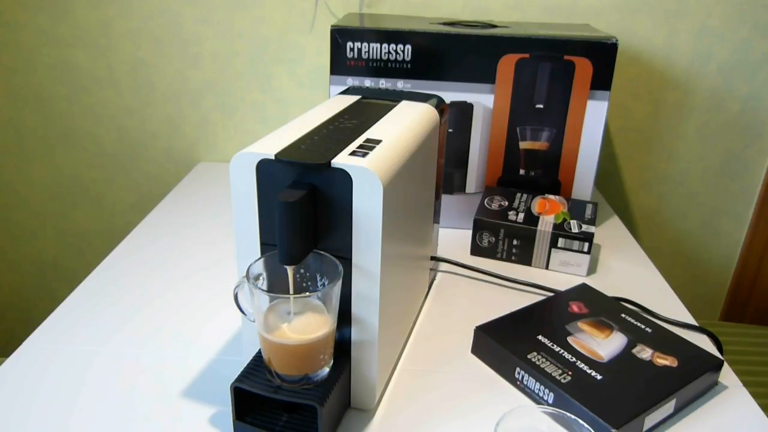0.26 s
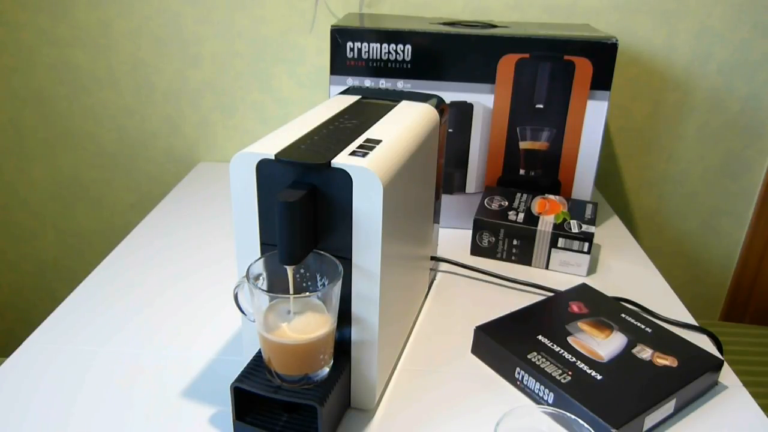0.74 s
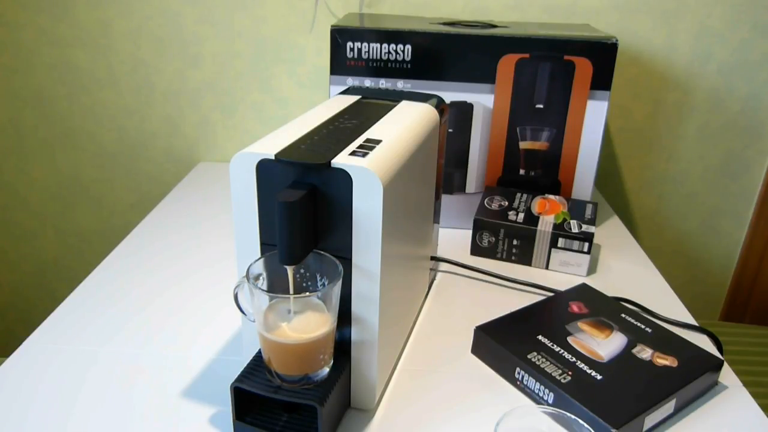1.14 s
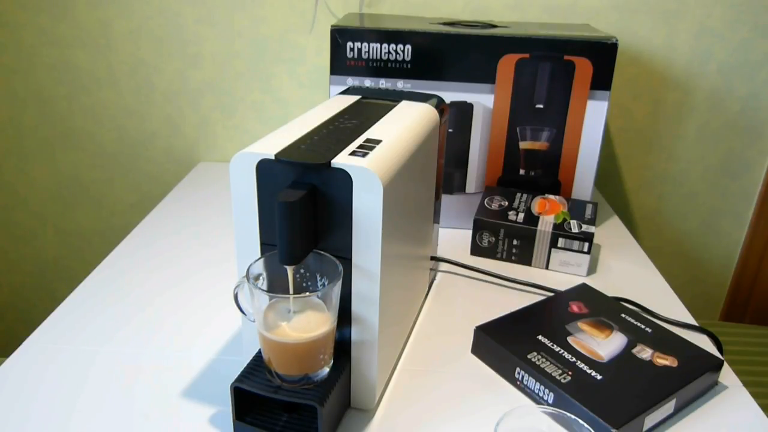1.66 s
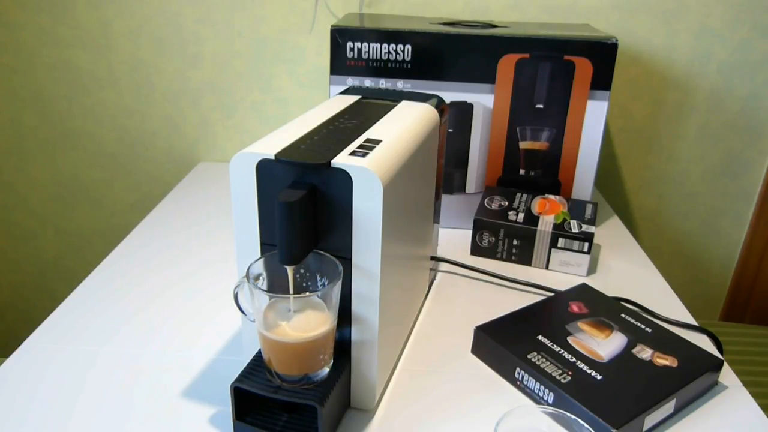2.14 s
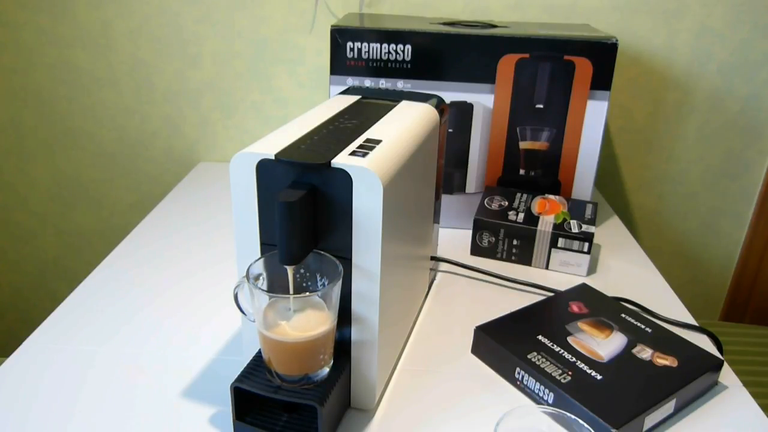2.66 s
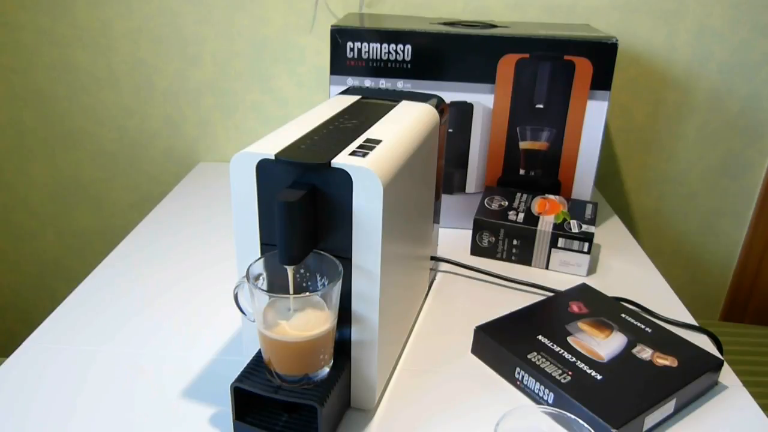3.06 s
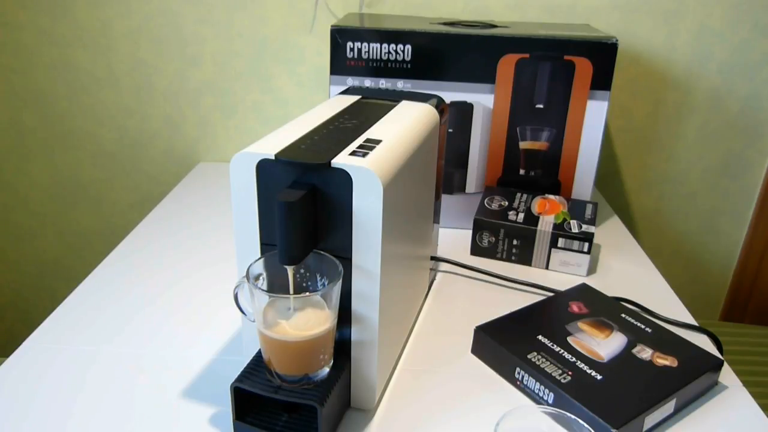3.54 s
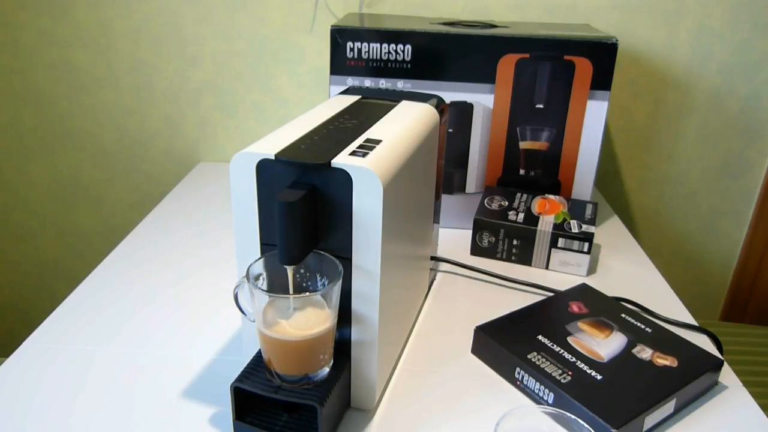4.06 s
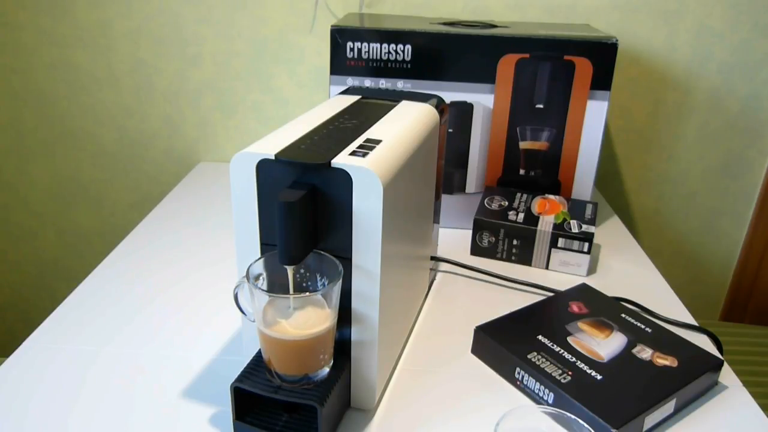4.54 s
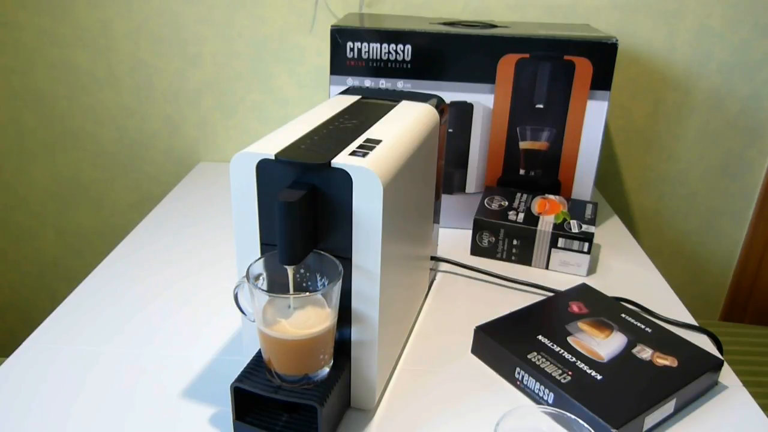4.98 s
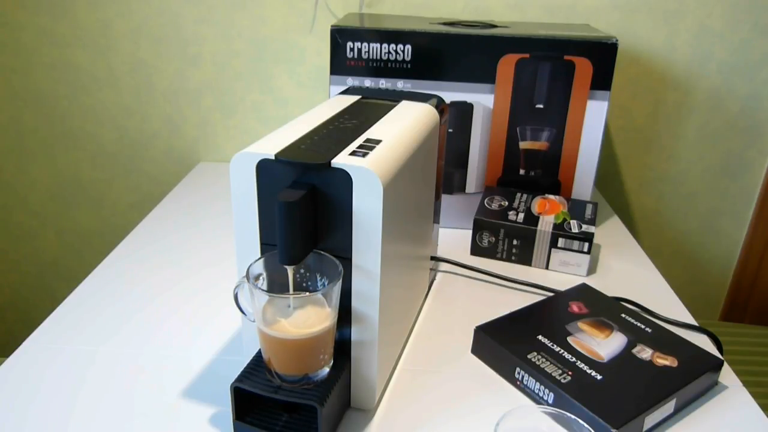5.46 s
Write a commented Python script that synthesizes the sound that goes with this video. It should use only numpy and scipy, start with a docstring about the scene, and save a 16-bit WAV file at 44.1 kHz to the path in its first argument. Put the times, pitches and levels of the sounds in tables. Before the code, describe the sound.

A capsule coffee machine's pump buzzes steadily with a rattling, hissing edge, then stops dead and rings out briefly in a small room.

```python
"""Capsule coffee machine, small room

A capsule coffee machine brews on a table in a small room, picked up in stereo at a distance that never changes.
Its mains-driven piston pump strokes strong-weak, so housing and table hum on every multiple of half the
mains rate. Valves tick and rattle on each stroke, a valve spring buzzes, a thin whine follows the pump and
the water hisses as noise in bands, over a room tone. The pump stops dead and the room rings out;
the microphone rolls off the top octave."""
import sys
import numpy as np
from scipy import signal
from scipy.io import wavfile

SR = 44100
rng = np.random.default_rng(int(sys.argv[2]) if len(sys.argv) > 2 else 0)


def wav_out(sig):
    """Save sig, one row per channel (or a flat mono array), as 16-bit PCM at SR to the path in sys.argv[1]."""
    wavfile.write(sys.argv[1], SR, np.round(np.clip(np.atleast_2d(sig).T, -1, 1) * 32767).astype(np.int16))


N = 251811
LEFT_RIGHT = np.array([[1], [-1]])

# pump rate, locked to the mains: [t/s, strokes per s]
PUMP_RATE = [(0.57, 50.02), (1.32, 50.008), (2.08, 50.012), (2.82, 50.013), (3.58, 50.005), (4.32, 50.01),
             (5.08, 50.004)]
STROKE_HZ = PUMP_RATE[0][1]
CYCLE_HZ, CYCLE_MS = STROKE_HZ / 2, 2000 / STROKE_HZ   # one cycle is a strong and a weak stroke
STOP_S = 5.588
VALVES_STOP_EARLY_S = 0.02   # valves and flow fall still one stroke before the housing does

# strong partials of housing and table: [multiple of the cycle rate, rms level/dB before changes, left-right/dB]
STRONG_HUM = [(3, -72, 0), (4, -66, 1), (5, -62, 0), (6, -44, 1), (7, -46, 1), (8, -51, -2), (9, -53, -2),
              (10, -56, -1), (11, -54, -2), (12, -50, -4), (13, -53, -2), (14, -38, -2), (15, -59, 2),
              (16, -42, -1), (17, -58, 1), (18, -47, 4), (19, -58, 1), (20, -60, 5), (21, -65, 0),
              (22, -60, -5), (24, -56, -5), (25, -60, 5), (26, -50, -2), (27, -63, 0), (28, -44, 0),
              (29, -53, -2), (30, -52, -4), (32, -59, 3), (33, -69, 0), (34, -63, 0), (35, -58, -5),
              (36, -56, -3), (37, -55, 0), (38, -55, 0), (39, -55, 1), (40, -52, -1), (41, -56, -2),
              (42, -60, -2), (43, -57, -2), (44, -56, 5), (45, -61, 1), (47, -60, 1), (48, -53, -1),
              (49, -59, 0), (50, -61, -3), (51, -60, -6), (53, -64, 1), (54, -56, 1), (57, -58, 1),
              (64, -60, -5), (65, -61, 0), (77, -58, -2), (79, -61, -7), (82, -60, 2)]
# weak spectrum about which all other multiples scatter: [f/Hz, rms level/dB before scatter and changes]
WEAK_HUM = [(520, -78), (850, -72), (1080, -74), (1330, -69.5), (1500, -67), (1630, -82), (1800, -65.5),
            (2000, -97), (2150, -77)]
TOP_MULTIPLE, WEAK_SCATTER_DB, WEAK_PAN_DB = 86, 2.5, 4
# phase by which the left channel leads, before reflections add to it: [f/Hz, lead/rad]
HUM_LEAD = [(60, 0), (200, 0), (225, -.4), (250, .4), (275, -.3), (300, .1), (325, -.5), (350, .4),
            (375, 1.8), (400, .1), (425, 0), (450, -2.1), (475, 1), (525, 1), (550, -.4), (600, .4),
            (650, -.3), (800, 0)]
# slow wander of a partial: [f/Hz, spread of level/dB]
WANDER = [(150, .15), (500, .5), (750, .6), (1000, 1.0), (2200, 1.4)]
# partials that change: [multiple, then change of level/dB while the pressure builds,
# in the first bright stretch, in the second, in the dull stretch between]
CHANGING = [(10, 4, 2, -1, -1), (13, -3, 3, 0, 2), (15, 2, 3, 0, -2), (17, 5, 4, -4, 1),
            (18, -4, -4, -1, 1), (19, 1, 3, 2, -13), (22, -2, 7, 0, -2), (25, -4, 1, 1, 1),
            (29, 1, -8, 0, -3), (30, -3, -2, 0, 2), (32, 2, 6, 1, 1), (33, -4, 10, -3, 1),
            (35, -4, -7, 0, -6), (37, 7, -9, -3, -7), (39, 3, 3, 2, -11), (40, 4, 4, 2, -1),
            (41, 3, 3, -1, 2), (42, -2, 2, 3, 0), (43, 1, -4, 2, -6), (47, -1, -3, 2, -1),
            (49, -1, -3, 1, -1), (50, -3, 3, 3, 1), (51, -5, 3, 0, 1), (53, -1, 6, 1, 3),
            (57, -4, -1, -1, 0), (77, -4, 2, -2, 1), (79, -8, 3, -3, 1), (82, -2, 2, 0, 3)]
PRESSURE_BUILDS_S, JUMP_S = 0.35, 0.031
# stretches where the hum jumps to a brighter colour and back: [from t/s, to t/s]
BRIGHT = [(.3, 2.34), (3.9, 5.8)]
DULLING_S = 1   # after the first stretch the hum dulls over this time

# knocks of the piston on the housing, which time the lower partials: [t/ms in the cycle, level/dB]
KNOCKS = [(8.8, -6), (14.22, 1.2), (25.08, -2.6), (34.85, -5.8), (36.73, -11)]
# blows that time the upper partials: lowest multiple they reach -> [t/ms in the cycle, level/dB]
UPPER_KNOCKS = {12: [(20.3, 0), (21.6, -2.2), (37.4, -10.2)], 20: [(16.2, 0), (24.1, 0)], 33: [(6.2, -1),
                (18.5, 0), (29.8, -.8), (37.3, -.7)], 59: [(3, -3.5), (10.4, -1.4), (16.2, 0), (30.8, -1.2),
                (33.5, -1.3)]}
# phase turns of the lower hum partials: [f/Hz, width/Hz]
PHASE_TURNS = [(170.2, 21), (294.6, 15), (310.8, 33), (449, 15), (505.7, 15)]
# phase scatter of the upper partials by reflections: [f/Hz, largest shift/rad]
SCRAMBLE = [(450, 0), (750, .1), (900, .25), (2000, .5)]

# decay once the pump has stopped: [f/Hz, t60/s]
RING_OUT = [(60, .15), (110, 0.18), (180, 0.32), (350, 0.21), (400, 0.33), (450, 0.97), (700, 0.22),
            (1100, 0.24), (2000, 0.3), (3000, 0.41), (8000, 0.4), (15000, 0.33)]
# table modes set ringing by the last stroke: [f/Hz, rms level/dB at the stop, t60/s]
FREE_MODES = [(160.7, -47, 0.46), (185.5, -41, 0.38), (451, -48, 0.5)]

# thin whine on the 130th multiple: [t/s, rms level/dB]
WHINE = [(0.0, -60), (0.2, -54.5), (2.3, -54), (4.4, -54), (4.7, -57), (5.55, -62)]

# effort of the pump: [t/s, hiss level/dB before trim, rattle gain/dB]
EFFORT = [(0.0, -39, -1.5), (0.17, -39, 0.5), (0.43, -39.5, -1), (3.09, -37.5, 0.5), (4.22, -39.5, 0.5),
          (5.55, -37.5, 0)]
HISS_TRIM_DB = -4.5
# colour of the water hiss: [f/Hz, relative level/dB per Hz]
HISS = [(25, -11), (60, -12), (100, -11), (130, -5.5), (200, -4.5), (330, -.5), (450, 1), (600, 2.5),
        (900, 4.5), (1100, 1.5), (2000, -2), (3000, -1.5), (4000, .5), (5000, 1), (8000, -3), (11300, -2.5),
        (12500, -15), (14200, -8), (15600, -29)]
# share of the hiss power that recurs each cycle: [f/Hz, share]
HISS_REPEATING = [(1200, 0.017), (1800, 0.19), (2600, 0.5), (4000, 0.63), (6000, 0.32), (9000, 0.15),
                  (14000, 0.18)]

# colour of the quiet room: [f/Hz, relative level/dB per Hz]
ROOM_TONE = [(35, -30), (60, -12), (110, -8), (248, -8), (433, 3), (700, -4), (2200, -15), (4850, -8),
             (14500, -14), (15500, -32)]
ROOM_TONE_DB = -61

# contacts in piston and valves, looped every cycle: [t/ms in the cycle, tick level/dB, rattle level/dB]
CONTACTS = [(8.6, -13, -46), (13.4, -20, -46), (16.6, -13, -55), (20.8, -16, -56), (28.6, -13, -48),
            (33.3, -18, -47), (36.4, -15, -53), (0.8, -20, -50)]
# small parts that ring: [f/Hz, width/Hz, relative level/dB]
PARTS = [(2176, 250, -8), (2516, 45, -7.5), (2734, 116, -0.5), (3743, 105, -4), (4006, 135, -3.5),
         (4860, 190, -10), (5010, 130, -6.5), (5350, 82, -16), (6720, 130, -9), (7200, 170, -12),
         (8360, 110, -8), (9100, 150, -5.5), (10300, 270, -4), (11300, 360, -3.5)]
# colour of the rattle: [f/Hz, relative level/dB per Hz]
RATTLE = [(880, -63), (1500, -5.5), (1990, -2), (2350, -11), (2750, -6.5), (2970, -16), (3180, -10),
          (3440, -8.5), (4990, -2.5), (5610, -4), (10200, -4.5), (13500, -10.5), (15500, -34)]
# share of the rattle power that recurs each cycle: [f/Hz, share]
RATTLE_REPEATING = [(1500, 1), (5000, 0.94), (7000, 0.54), (12000, 0.5)]
HABIT_S = 0.83   # time over which a recurring noise pattern changes

# valve spring buzzing while the valve is open:
# [opens t/ms in the cycle, shuts t/ms, level/dB, extra level/dB in the first bright stretch]
VALVE_OPEN = [(9.22, 16, -43.5, 1), (29, 31, -43, -5), (34, 36.6, -42.5, -1)]
SPRING_HZ, SPRING_WIDTH_HZ = 5022, 450

# stereo likeness of every noise: [f/Hz, left-right correlation]
LIKENESS = [(60, 0.4), (130, 0.3), (290, 0.4), (640, 0.09), (1410, 0.74), (3100, 0.74), (6820, 0.81),
            (15000, 0.4)]
# stereo balance of every noise: [f/Hz, left-right/dB]
LEAN = [(60, 0), (240, -2), (950, -1), (3770, 1), (15000, 0.5)]
MIC_ROLL_OFF_HZ, CUTOFF_HZ = 12630, 15740


def amp(db):
    """Decibels to gain."""
    return 10 ** (np.asarray(db) / 20)


def pan(db):
    """Left and right gains that differ by this many decibels."""
    return amp(db / 2 * LEFT_RIGHT)


def rms_one(x):
    """Scale to rms 1."""
    return x / np.sqrt(np.mean(x ** 2) + 1e-20)


def in_time(rows):
    """Columns of a curve, one value a sample."""
    s, *columns = np.transpose(rows)
    return [np.interp(np.arange(N) / SR, s, column) for column in columns]


def at_hz(points, hz):
    """A spectrum read on a log-frequency axis."""
    f, values = np.transpose(points)
    return np.interp(np.log(hz), np.log(np.maximum(f, 1)), values)


def drift(rate):
    """Slow chance of spread 1: noise through a double one-pole low-pass at this rate in Hz."""
    step = 64   # samples between the coarse values
    pole = np.exp(-2 * np.pi * rate * step / SR)
    noise = rng.standard_normal(N // step + 3002)
    slow = signal.lfilter([1], [1, -2 * pole, pole * pole], noise)[3000:]   # drop the run-in
    return np.interp(np.arange(N) / step, np.arange(len(slow)), rms_one(slow - slow.mean()))


def after_stop(early_s=0):
    """Seconds since the pump stopped, 0 before."""
    return np.maximum(np.arange(N) / SR - STOP_S + early_s, 0)


def dying(hz, early_s=0):
    """Gain 1 while the pump runs, then the ring-out at this pitch."""
    return amp(-60 * after_stop(early_s) / at_hz(RING_OUT, hz))


def ring(x, hz, width):
    """One two-pole resonance, gain 1 on top."""
    r = np.exp(-np.pi * width / SR)
    feedback = [1, -2 * r * np.cos(2 * np.pi * hz / SR), r * r]
    return signal.lfilter([(1 - r * r) / 2, 0, (r * r - 1) / 2], feedback, x)


def changes():
    """Four controls: pressure still lacking, two bright stretches with quick edges, and a gradual dulling."""
    t = np.arange(N) / SR
    lacking = (1 - np.tanh((t - PRESSURE_BUILDS_S) / JUMP_S)) / 2
    first, second = [(np.tanh((t - on) / JUMP_S) - np.tanh((t - off) / JUMP_S)) / 2 for on, off in BRIGHT]
    dull = np.clip((t - BRIGHT[0][1]) / DULLING_S, 0, 1) * (1 - second)
    return np.array([lacking, first, second, dull])


def habit(cycle):
    """White noise that comes back every cycle and changes only slowly from round to round."""
    size = round(SR / CYCLE_HZ)
    keep = np.exp(-1 / (CYCLE_HZ * HABIT_S))
    fresh = rng.standard_normal((2, 2, int(cycle[-1]) + 61, size))
    rounds = signal.lfilter([1], [1, -keep], fresh, axis=2)[:, :, 60:]   # drop the run-in
    return rms_one(rounds[:, :, cycle.astype(int), (cycle % 1 * size).astype(int)])


def banded_noise(spectrum, patchy_db, dies, recurring=None, shares=None):
    """Third-octave bands of stereo noise, each with its level, flicker and likeness; rms 1."""
    out, together = 0, drift(2.7)
    lowest = spectrum[0][0]
    edges = lowest * 2 ** np.arange(0, np.log2(17000 / lowest), 1 / 3)
    white = rng.standard_normal((2, 2, N))
    for k, (low, high) in enumerate(zip(edges, edges[1:])):
        hz = np.sqrt(low * high)
        source = white[k % 2]   # neighbouring bands use different noise
        if recurring is not None:
            share = at_hz(shares, hz)
            source = np.sqrt(share) * recurring[k % 2] + np.sqrt(1 - share) * source
        band = signal.butter(2, [low, high], "band", fs=SR, output="sos")
        mid, side = signal.sosfilt(band, source)
        alike = at_hz(LIKENESS, hz)
        pair = np.sqrt(1 + alike) * mid + np.sqrt(1 - alike) * side * LEFT_RIGHT
        flicker_db = patchy_db * (0.42 * together + drift(6.3))
        gain = amp(at_hz(spectrum, hz) + flicker_db)
        if dies:
            gain = gain * dying(hz, VALVES_STOP_EARLY_S)
        out = out + gain * pair * pan(at_hz(LEAN, hz))
    return out / np.sqrt(np.mean(out[:, :N // 2] ** 2))   # level taken while the pump runs


def partials():
    """Rows of (multiple, dB, left-right dB): the strong partials, and the weak ones between and above."""
    strong = {row[0]: row for row in STRONG_HUM}
    rows = []
    for k in range(STRONG_HUM[0][0], TOP_MULTIPLE + 1):
        level_luck, pan_luck = rng.standard_normal(2)
        weak_db = at_hz(WEAK_HUM, k * CYCLE_HZ) + WEAK_SCATTER_DB * level_luck
        rows.append(strong.get(k, (k, weak_db, WEAK_PAN_DB * pan_luck)))
    return rows


def timing(k, hz, scatter):
    """Phase that the blows give a partial, scattered for the upper ones and turned for the lower ones."""
    upper = [low for low in UPPER_KNOCKS if low <= k]
    blows = UPPER_KNOCKS[max(upper)] if upper else KNOCKS
    knocked = np.angle(sum(amp(db) * np.exp(-2j * np.pi * hz * ms / 1000) for ms, db in blows))
    if upper:
        return knocked + at_hz(SCRAMBLE, hz) * scatter
    return knocked + sum(np.arctan((top * top - hz * hz) / (hz * width)) for top, width in PHASE_TURNS)


def hum(cycle):
    """Housing and table sound every multiple of the cycle, each partial timed by the knocks."""
    out, controls = np.zeros((2, N)), changes()
    for k, db, pan_db in partials():
        hz = k * CYCLE_HZ
        scatter, spread, detune = rng.uniform(-1, 1, 3)
        wander_db = at_hz(WANDER, hz)
        change_db = sum(np.dot(row[1:], controls) for row in CHANGING if row[0] == k)
        # reflections reach the two sides of the microphone differently
        lead = at_hz(HUM_LEAD, hz) + .8 * spread * np.clip((hz - 500) / 400, 0, 1)
        # after the stop each partial drifts off pitch by its own random amount, mostly upward
        off_pitch = 2 * np.pi * 11.7 * (detune + 0.74) * after_stop()
        phase = 2 * np.pi * k * cycle + timing(k, hz, scatter) + off_pitch + 0.2 * wander_db * drift(0.94)
        level = np.sqrt(2) * amp(db + change_db + wander_db * drift(1.0)) * dying(hz)
        stereo = pan(pan_db) * np.exp(.5j * lead * LEFT_RIGHT)
        out += (level * np.exp(1j * phase) * stereo).real
    return out


def whine(cycle):
    """A thin tone locked to the pump; its pitch rocks once a cycle and its phase is slowly adrift."""
    tone = np.cos(2 * np.pi * 130 * cycle + 1.3 * np.sin(2 * np.pi * cycle) + .35 * drift(2.0))
    level = amp(in_time(WHINE)[0] + 0.4 * drift(2.2))
    return np.sqrt(2) * level * dying(3250, VALVES_STOP_EARLY_S) * tone


def water_hiss(cycle, level_db):
    """Flowing water as banded noise, part of which recurs with every pump cycle."""
    noise = banded_noise(HISS, patchy_db=0.5, dies=True, recurring=habit(cycle), shares=HISS_REPEATING)
    return amp(level_db + HISS_TRIM_DB) * noise


def room_tone():
    """The quiet room as flickering banded noise that outlasts the pump."""
    return amp(ROOM_TONE_DB) * banded_noise(ROOM_TONE, patchy_db=2.0, dies=False)


def contacts(cycle):
    """Click trains of ticks and of rattle onsets; every contact is a little early or late, hard or soft."""
    ticks, shakes = np.zeros(N), np.zeros(N)
    rounds = np.arange(-1, int(cycle[-1]))
    for ms, tick_db, rattle_db in CONTACTS:
        late, tick_luck, rattle_luck = rng.standard_normal((3, len(rounds)))
        at = np.interp(rounds + ms / CYCLE_MS, cycle, np.arange(N), left=-N)
        at = (at + .00002 * SR * late).astype(int)
        on = (at >= 0) & (at < (STOP_S - VALVES_STOP_EARLY_S) * SR)
        ticks[at[on]] += amp(tick_db + 0.35 * tick_luck[on])
        shakes[at[on]] += amp(rattle_db + 1.65 * rattle_luck[on])
    # the contact is not perfectly hard; the tiny offsets are inaudible
    ticks = signal.lfilter([.5], [1, -.5], ticks + 1e-18)
    return ticks, shakes + 1e-18


def valves(cycle, gain_db):
    """Ticks ring the small parts; each contact sets off a short rattle, coloured by the same parts."""
    ticks, shakes = contacts(cycle)
    fade = np.exp(-1 / (0.0058 * SR))   # the rattle dies with a 5.8 ms time constant
    noise = banded_noise(RATTLE, patchy_db=1.18, dies=False, recurring=habit(cycle), shares=RATTLE_REPEATING)
    rattle = signal.lfilter([1], [1, -fade], shakes) * noise
    out = rattle.copy()
    for hz, width, db in PARTS:
        side = pan(2.2 * rng.uniform(-0.73, 1))
        struck = ticks * amp(1.0 * drift(3.0)) * SR / (30 * width)   # narrow parts are struck harder
        drive = amp(-19.5) * struck * side + amp(10.0) * rattle
        out += amp(db + 0.3 * drift(0.35)) * ring(drive, hz, width)
    return amp(gain_db) * out


def spring(cycle):
    """The spring sings afresh at each opening, unevenly from stroke to stroke, and is stilled at shutting."""
    ms, out = cycle % 1 * CYCLE_MS, 0
    first_bright = changes()[1]
    for opens, shuts, db, bright_db in VALVE_OPEN:
        phase = 2 * np.pi * SPRING_HZ * (ms - opens) / 1000 + 0.89 * drift(6.9)
        level = amp(db + bright_db * first_bright + 1.5 * drift(40.0))
        out = out + level * (ms > opens) * (ms < shuts) * np.sin(phase)
    running = after_stop(VALVES_STOP_EARLY_S) == 0
    return ring(out * running, SPRING_HZ, SPRING_WIDTH_HZ)


def free_modes():
    """After the last stroke the table rings on, unevenly, at pitches of its own."""
    s, out = after_stop(), 0
    onset = 1 - np.exp(-s / 0.01)
    for hz, db, t60 in FREE_MODES:
        level = amp(db - 60 * s / t60 + 2.0 * drift(30.0))
        out = out + np.sqrt(2) * onset * level * np.sin(2 * np.pi * hz * s)
    return out


def scene():
    """Pump hum, whine, water hiss, room tone, valves and spring, then the table ringing on."""
    cycle = np.cumsum(in_time(PUMP_RATE)[0]) / (2 * SR)   # strong-weak cycles since the start
    hiss_db, rattle_db = in_time(EFFORT)
    steady = hum(cycle) + whine(cycle) + water_hiss(cycle, hiss_db) + room_tone()
    return steady + valves(cycle, rattle_db) + spring(cycle) + free_modes()


def record(dry):
    """The microphone rolls off in the top octave; the top is cut steeply."""
    soft = signal.sosfilt(signal.butter(3, MIC_ROLL_OFF_HZ, fs=SR, output="sos"), dry)
    return signal.sosfilt(signal.ellip(12, .5, 60, CUTOFF_HZ, fs=SR, output="sos"), soft)


dry = scene()
out = record(dry)
wav_out(out)
```